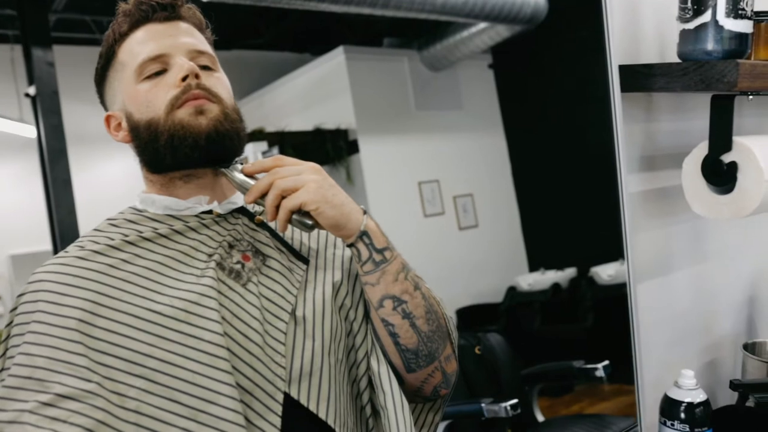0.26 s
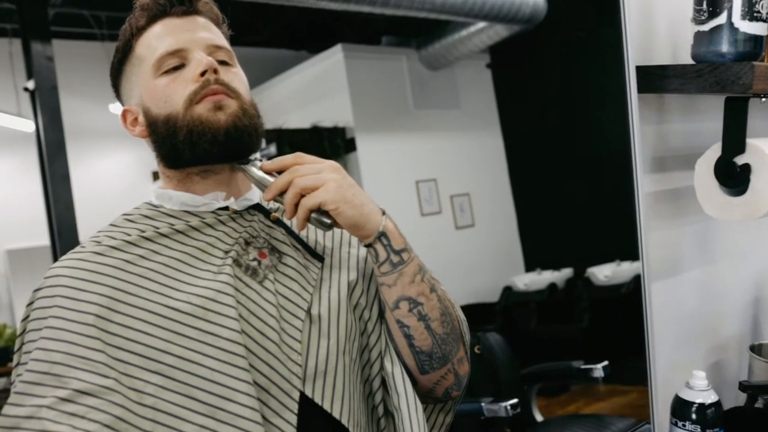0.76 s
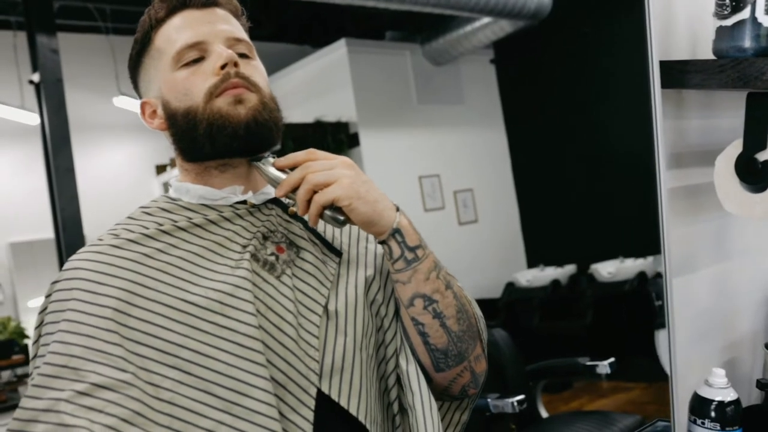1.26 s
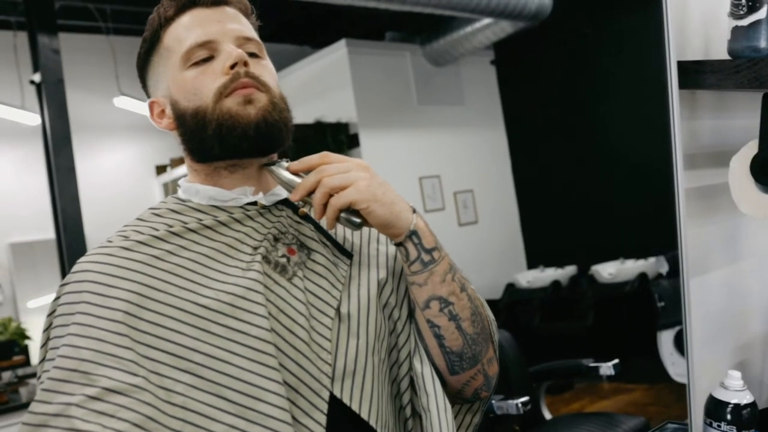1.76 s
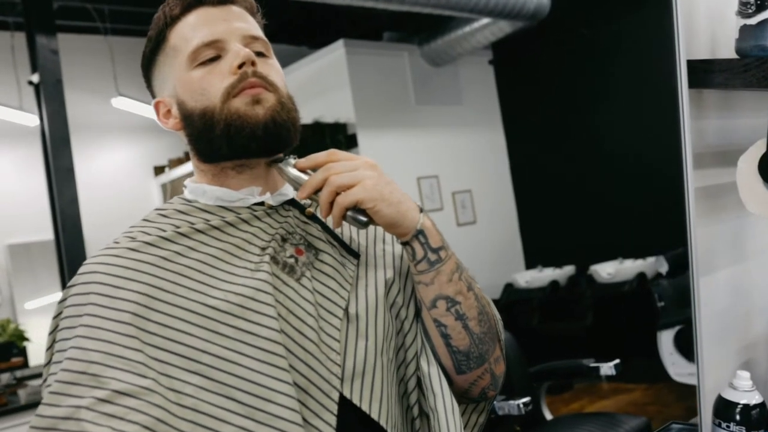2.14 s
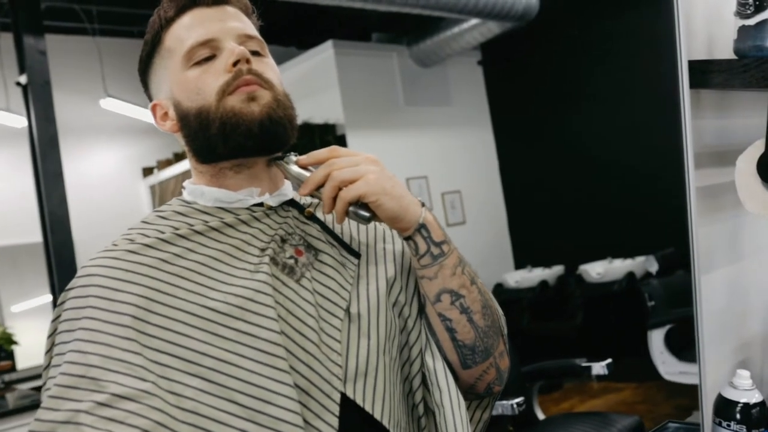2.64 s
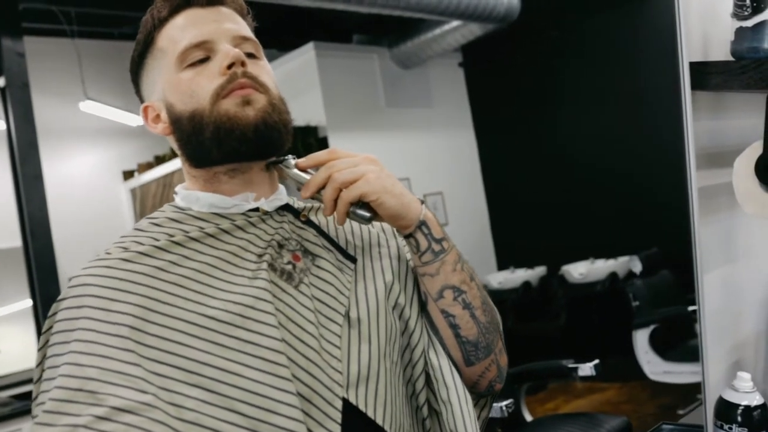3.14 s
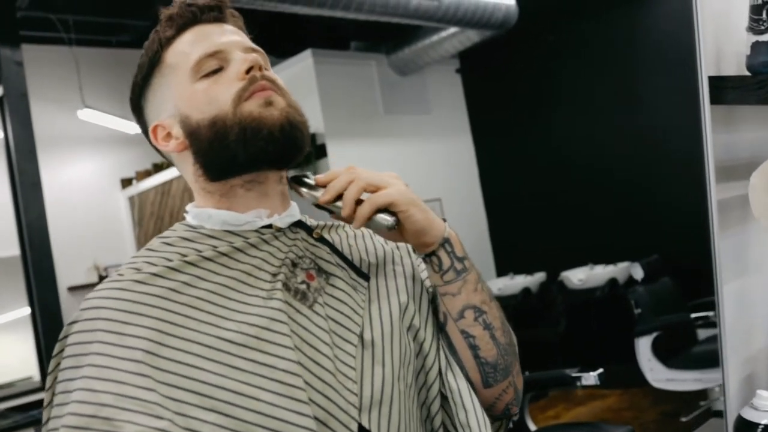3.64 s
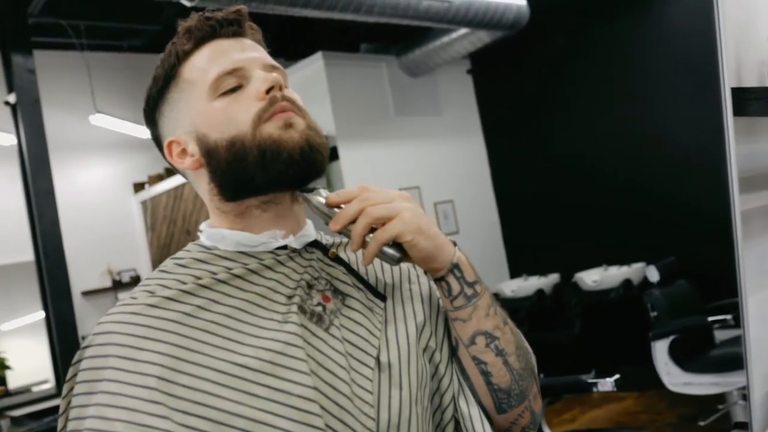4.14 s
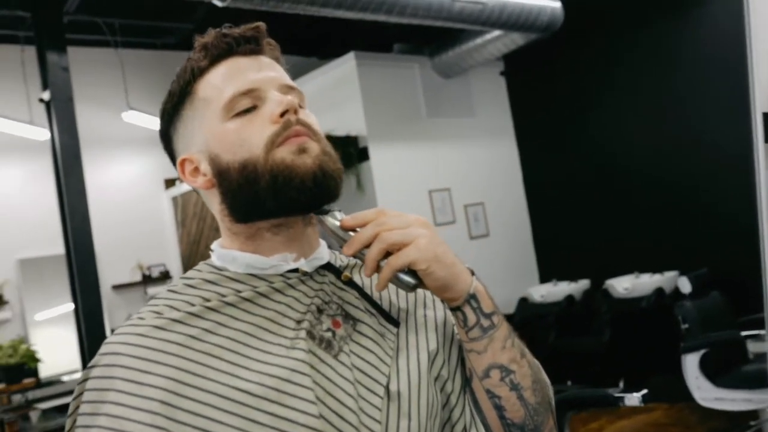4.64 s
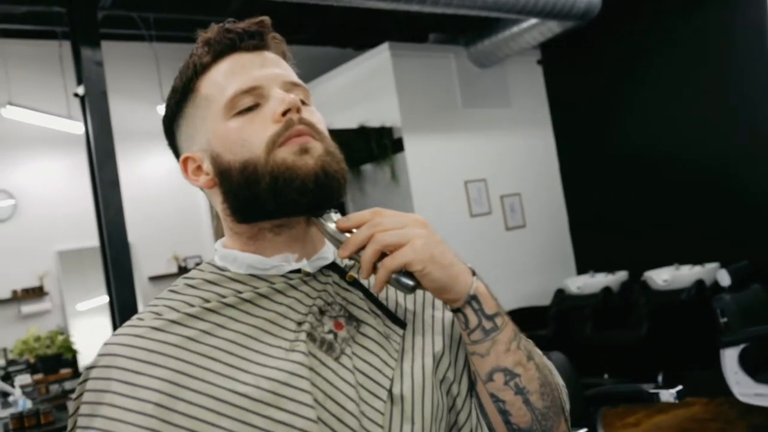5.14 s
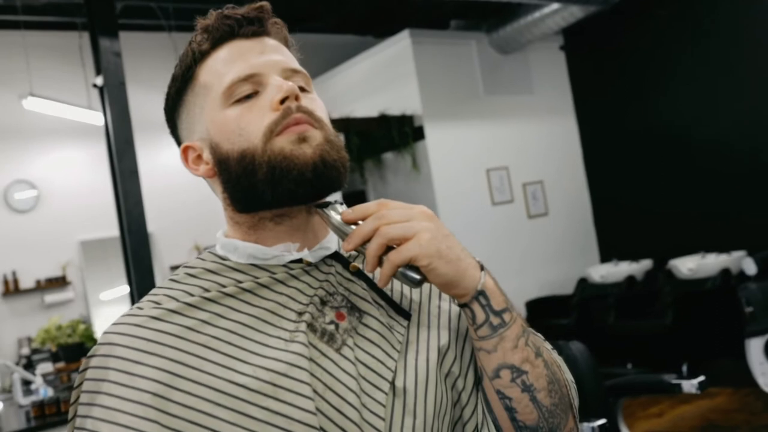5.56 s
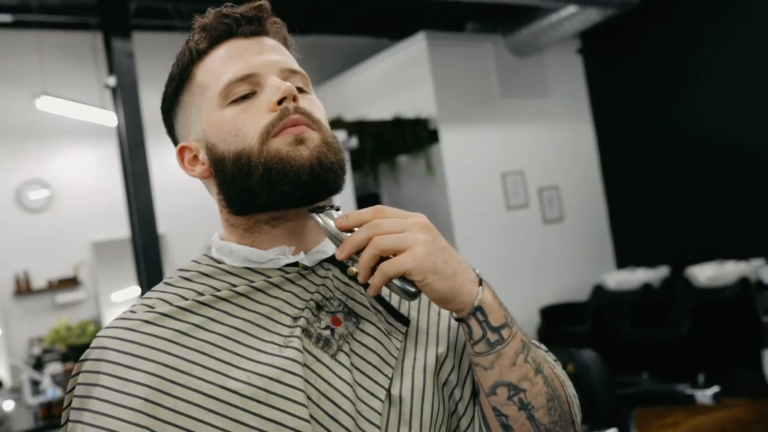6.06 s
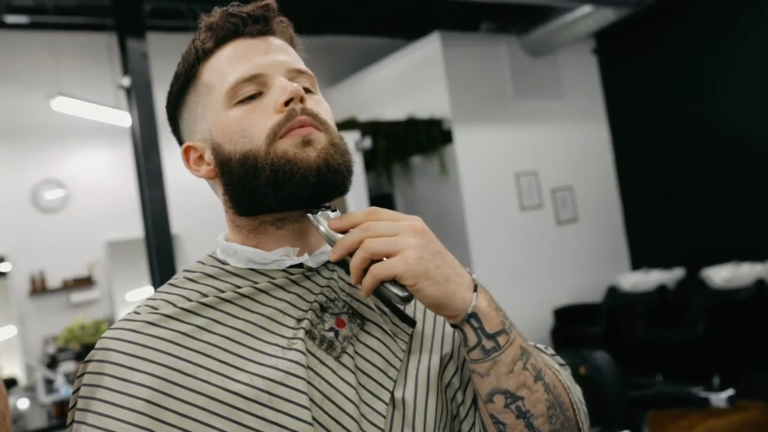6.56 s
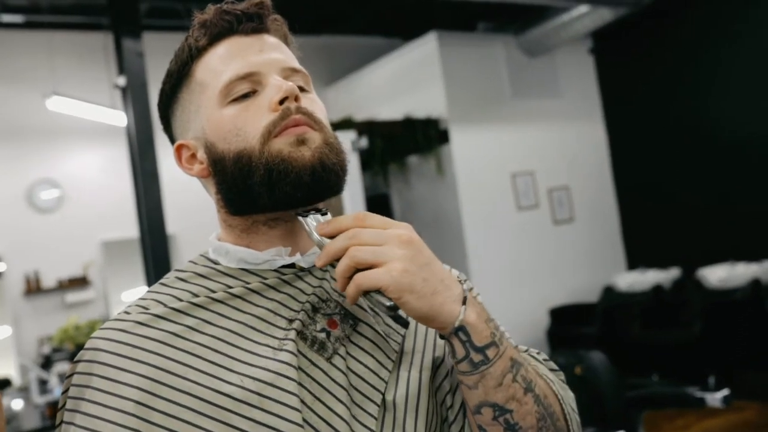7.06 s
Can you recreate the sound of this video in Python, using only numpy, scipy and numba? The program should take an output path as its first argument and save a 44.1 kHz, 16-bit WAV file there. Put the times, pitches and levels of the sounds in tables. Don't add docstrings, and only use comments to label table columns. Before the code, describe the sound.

A small electric trimmer buzzes steadily and brightly up close, with fine crackles of snapping hair as it moves along a beard in a quiet shop.

```python
import sys
import numpy as np
from scipy import signal
from scipy.fft import rfft, irfft
from scipy.io import wavfile
from scipy.ndimage import uniform_filter1d
from numba import njit

SR = 44100
rng = np.random.default_rng(int(sys.argv[2]) if len(sys.argv) > 2 else 0)


def store_pcm(level_fs):
    pcm = np.round(np.clip(level_fs, -1, 1) * 32767).astype(np.int16)
    wavfile.write(sys.argv[1], SR, np.atleast_2d(pcm).T)


def boost(x):
    u = np.asarray(x, float) / 20
    return 10 ** u


N = 321489
TIME_S = np.arange(N) / SR

# start_s, roll [0-1.2]
ROLL = [(0, 0.13), (.5, 0.45), (1.0, 0.46), (1.6, 0.7), (2.7, 0.7), (3.1, 0.03), (3.45, 0.2), (4.75, 0.03),
        (5.1, 0.59), (5.8, 1.04), (6.3, 1.07), (6.65, 0.92), (6.9, 0.9), (7.29, 0.93)]
SAG_LAG_S = 0.04
ROCK_PLACE, STROKE_PLACE = 0.84, 0.39


def curve(table):
    s, *columns = np.transpose(table)
    return [np.interp(TIME_S, s, c) for c in columns]


def level(x, db):
    return x * boost(db) / np.sqrt(np.mean(x ** 2))


def steady(x, span_s=0.33):
    k = int(span_s * SR)
    power = uniform_filter1d(uniform_filter1d(x ** 2, k), k)
    return x / np.sqrt(power + 1e-18)


def walk(rate, at_s):
    k = int(200 / rate)
    steps = np.repeat(rng.standard_normal(2600 // k), k)
    slewed = 1.3 * uniform_filter1d(uniform_filter1d(steps, k), k)
    return np.interp(at_s, np.arange(len(steps)) / 200, slewed)


def colour(x, points, rings=(), size=4096):
    hz = np.arange(size // 2 + 1) * SR / size + 1
    point_hz, point_db = np.array(points)[:, :2].T
    db = np.interp(np.log(hz), np.log(point_hz), point_db)
    db = db + sum(top / (1 + (2 * (hz - f) / width) ** 2) for f, width, top in rings)
    cep = irfft(np.log(boost(db)))
    cep[1:size // 2] *= 2
    cep[size // 2 + 1:] = 0
    return signal.fftconvolve(x, irfft(np.exp(rfft(cep))))[:N]


def clicks(where, size):
    where = np.clip(where, 8, N - 9)
    at = where.astype(int)[:, None] + np.arange(-7, 9)
    gap = at - where[:, None]
    pulse = size[:, None] * np.sinc(gap) * np.cos(np.pi * gap / 16) ** 2
    return np.bincount(at.ravel(), pulse.ravel(), N)


def band(x, lo_hz, hi_hz):
    return signal.sosfiltfilt(signal.butter(2, [lo_hz, hi_hz], "band", fs=SR, output="sos"), x)


@njit
def ring(x, hz, width):
    y, b, l = np.empty(len(x)), 0., 0.
    for i in range(len(x)):
        g, k = np.tan(np.pi * hz[i] / SR), width / hz[i]
        v = (b + g * (x[i] - l)) / (1 + g * (g + k))
        b, l, y[i] = 2 * v - b, l + 2 * g * v, k * v
    return y


def double_ring(knock, hz, wide_hz, narrow_hz):
    return steady(ring(ring(knock, hz, wide_hz), hz, narrow_hz))


def rung(rattle, knock, lo_hz, hi_hz, ring_hz, ring_db, width_hz):
    struck = band(knock, lo_hz, min(hi_hz, 7900))
    return steady(band(rattle, lo_hz, hi_hz)) + boost(ring_db) * steady(ring(struck, ring_hz, width_hz))


def travel(x, bend_s, tail_db, tail_s, size=4096):
    hz = np.arange(size // 2 + 1) * SR / size
    tail = boost(tail_db - 60 * np.arange(size) / SR / tail_s) * rng.standard_normal(size)
    tail[0] = 1
    phase = np.angle(rfft(tail)) - 4 * np.pi * bend_s * np.sqrt(hz * 5000)
    paths = np.roll(irfft(np.exp(1j * phase)), size // 2)
    return signal.fftconvolve(x, paths)[size // 2:size // 2 + N]


def tufts():
    # start_s, length_s, snap_level_db
    bites = [(0.12, 0.011, -68.5), (0.168, 0.074, -54.5), (0.271, 0.033, -53.5), (0.33, 0.044, -53.5),
             (0.42, 0.082, -60.5), (0.57, 0.049, -53.0), (0.697, 0.006, -65.5), (0.841, 0.009, -61.5),
             (0.969, 0.038, -55.0), (1.023, 0.058, -54.5), (1.385, 0.01, -56.0), (1.56, 0.019, -57.5),
             (1.616, 0.0074, -55), (1.72, 0.053, -57.0), (1.803, 0.045, -50.0), (1.989, 0.04, -50.5),
             (2.038, 0.031, -49.5), (2.085, 0.0034, -54.5), (2.229, 0.027, -53), (2.277, 0.017, -52.5),
             (2.375, 0.012, -65), (2.603, 0.026, -57.0), (2.666, 0.0047, -63), (2.758, 0.006, -70),
             (2.858, 0.041, -55), (2.916, 0.039, -54.5), (2.967, 0.0077, -59.5), (3.1, 0.03, -52),
             (3.134, 0.042, -53.5), (3.322, 0.015, -52.0), (3.343, 0.036, -51.5), (3.392, 0.014, -57),
             (3.414, 0.0022, -55), (3.427, 0.0046, -55), (4.534, 0.005, -61), (4.579, 0.0063, -55.5),
             (4.602, 0.021, -57.5), (4.653, 0.007, -56.5), (4.69, 0.031, -55.5), (4.741, 0.058, -53.5),
             (4.837, 0.072, -54), (4.915, 0.09, -53.5), (5.028, 0.062, -56), (5.19, 0.026, -56.0),
             (5.274, 0.046, -54.5), (5.328, 0.034, -54), (5.574, 0.014, -67), (5.61, 0.015, -62),
             (5.8, 0.006, -65), (5.933, 0.0048, -58), (6.021, 0.024, -57), (6.441, 0.005, -77),
             (6.49, 0.006, -61.5), (6.703, 0.011, -65.5), (6.75, 0.023, -55), (6.79, 0.0019, -75),
             (6.805, 0.015, -52.5), (6.825, 0.046, -51.5), (6.905, 0.026, -52.5), (6.954, 0.021, -57)]
    bite_s, clear_s, stubble_db = 0.00524, 0.01104, -76
    t = np.arange(0, N / SR + 1, 1 / 1000)
    start, length, db = np.transpose(bites)[:, :, None]
    edge = np.maximum(start - t, 0) / bite_s + np.maximum(t - start - length, 0) / clear_s
    power = boost(stubble_db + 50) ** 2 + np.sum((boost(db + 50) * np.exp(-edge)) ** 2, axis=0)
    return np.interp(TIME_S, t, np.sqrt(power))


def shaft(load):
    # start_s, speed_hz
    free = [(0, 108.3), (.14, 108.32), (.3, 108.08), (1.3, 108.1), (1.9, 107.95), (2.2, 107.65),
            (2.75, 107.6), (3.05, 107.3), (3.3, 107.25), (3.55, 107.55), (4.5, 107.6), (5.0, 107.25),
            (5.5, 107.55), (6.0, 107.5), (6.2, 107.7), (6.75, 107.7), (7.0, 107.35), (7.29, 107.5)]
    hunt_hz = 0.045 * walk(9, TIME_S)
    sag_hz = 0.8 * uniform_filter1d(load, int(SAG_LAG_S * SR), origin=600)
    return np.cumsum(curve(free)[0] + hunt_hz - sag_hz) / SR


def motor(turns, load):
    # multiple, level_in_group_db
    orders = [(1, -29.5), (2, -25.5), (3, -35), (4, -32), (5, -14), (6, -10.5), (7, 0), (8, -16.5),
              (9, -13), (10, -21), (11, -15), (12, -14), (13, -8), (14, -18.5), (15, -9.5), (16, -17.5),
              (17, -10), (18, -12), (19, -17), (20, -10), (21, -11), (22, -8), (23, -34), (24, -32)]
    # multiple, level_db, db_per_roll, db_per_full_tuft
    turned_orders = [(7, -63.5, 5.5, 0.5), (5, -71, -9.5, 2), (6, -78.5, 3.5, 6.5)]
    roll, = curve(ROLL)
    turned = {k: db + roll_db * roll + tuft_db * load for k, db, roll_db, tuft_db in turned_orders}
    beat = 2 * np.pi * (turns - ROCK_PLACE)
    throb_db = 3 * np.cos(beat) - 2 * np.cos(2 * beat)
    lower_db, upper_db = -60.5, -59.5 - 1.5 * load + throb_db
    out = 0
    for k, db in orders:
        drift_db, start = 1.9 * walk(1.5, TIME_S), rng.random()
        group_db = upper_db if k > 13 else lower_db
        line_db = turned.get(k, group_db + db + drift_db)
        out = out + boost(line_db) * np.sqrt(2) * np.sin(2 * np.pi * (k * turns + start))
    return out


def stroke_taps(turns, load):
    # place_turns, level_db
    tap_places = [(0.022, -5.5), (0.106, 1), (0.199, 0), (0.291, -11.5), (0.406, -26), (0.528, -10),
                  (0.601, -5.5), (.70, -4), (0.812, -33), (0.919, -4)]
    # hz, gain_db
    body_colour = [(900, -20), (1500, -50), (2400, 2.5), (3200, -11), (4100, -3.5), (5000, -1.5), (7200, 4),
                   (7700, -9.5), (8600, -11.5), (9200, -20.5), (10000, -20.5), (11500, -33.5), (14000, -49),
                   (16000, -77)]
    # hz, width_hz, gain_db
    body_rings = [(1645, 170, 2), (2080, 190, 12), (6100, 68, 9.5), (6720, 1160, 3), (8306, 520, 11),
                  (9104, 490, 11.5)]
    turn = np.arange(int(turns[-1]))
    start = np.searchsorted(turns, turn)
    tuft = load[start]
    seat = np.cumsum(0.9 + 2.5 * load)[start] / SR
    taps, stops = [], []
    for place, db in tap_places:
        creep, swell_db = 0.0055 * walk(1.15, seat), 3.4 * walk(1.5, seat)
        late, hard = rng.standard_normal((len(turn), 2)).T
        shake_s = (2.2e-6 + 18e-6 * np.minimum(tuft, 0.7)) * late
        jolt_db = (0.2 + 2.6 * np.minimum(tuft, 0.8)) * hard
        where = np.interp(turn + place + creep, turns, np.arange(N)) + SR * shake_s
        taps.append(clicks(where, boost(db + swell_db + jolt_db)))
        stops.append(clicks(where, boost(jolt_db)))
    body = travel(colour(sum(taps), body_colour, body_rings), bend_s=0.002, tail_db=-17.5, tail_s=0.01)
    knock = travel(stops[1] + stops[6], bend_s=0.002, tail_db=-13.5, tail_s=0.014)
    return body, knock


def case_rattle(body, knock, turns):
    # start_s, upper_hz, upper_db, lower_hz, lower_db, grip_db, rocking_db
    case_rings = [(0, 3400, 0, 3180, -11, 1, 4), (.56, 3460, 3, 3150, -10, 1, 3),
                  (.62, 3740, 2.5, 2910, -3, 3.5, 3.5), (1.2, 3770, -1.5, 2930, 2, 1.5, 6),
                  (1.7, 3830, -6, 3010, 1, -1, 6), (1.85, 3660, -9, 3106, -6.5, 0, 3),
                  (2.4, 3600, -17, 3220, -3, -2.5, 0), (2.8, 3600, -10, 3150, 3, -5, -0.5),
                  (3.1, 3623, -10, 3360, 1, 1.5, 2), (3.5, 3500, 4, 3160, -3, -4, 1),
                  (3.8, 3440, 0, 3000, -6, -3.5, 4.5), (3.9, 3530, -1, 2870, -1, -1.5, 3.5),
                  (4.6, 3620, 0, 2783, 0, 1, 3), (4.9, 3560, 0, 2860, -4, -1.5, 0),
                  (5.1, 3660, 1, 3310, -0.5, 2, 0), (5.5, 3720, -4, 3323, 6, -1.5, 3),
                  (6.5, 3530, -1, 3150, 3.5, -0.5, 7), (7.29, 3600, -4, 3150, -1, 3, 5)]
    case_hz, case_db, deep_hz, deep_db, grip_db, rock_db = curve(case_rings)
    case = rung(body, knock, 2663, 4050, case_hz, case_db, 260.0)
    case = case + boost(deep_db) * double_ring(knock, deep_hz, 670.0, 290.0)
    case = np.roll(band(case, 2570, 4840), int(0.0039 * SR))
    beat = 2 * np.pi * (turns - ROCK_PLACE)
    return case * boost(rock_db * np.cos(beat) + 2.3 * np.cos(2 * beat)), grip_db


def blade_ring(body, knock, stroke):
    # start_s, lower_hz, lower_db, outward_lead_db, upper_hz, upper_db
    steel_rings = [(0, 4780, 12, -1, 5170, 4), (.45, 4800, 3, 6.5, 5250, -2), (.62, 4600, 5, 4, 4980, 7),
                   (1.3, 4680, 6, 2.5, 4970, 8), (1.62, 4830, 11, 2.5, 5210, 3.5),
                   (1.9, 4930, 5, -1, 5130, 8), (2.33, 4900, -8, 1.5, 5090, 11),
                   (2.75, 4800, -10, 3, 5150, 6), (3.0, 4700, -2, -1, 5200, -6),
                   (3.15, 4530, 3.5, 2, 5210, -11), (3.42, 4560, 10, 1, 5230, 0),
                   (3.5, 4900, 7, 1, 5255, 10.5), (3.6, 4650, 9, 4.5, 5300, -6),
                   (3.81, 4720, 7.5, 2.5, 5400, -2), (3.87, 4720, 1.5, 4.5, 5150, 0),
                   (4.4, 4750, 6, 6, 5120, 2), (4.63, 4700, 6, 3, 5190, -5), (4.85, 4640, 7, 4, 5300, 1),
                   (5.46, 4580, 3, 0, 5020, -4), (5.7, 4570, -3, -1, 5020, -8),
                   (6.01, 4800, 2, 6, 5140, -5), (6.12, 4730, 3, 6, 5040, -12),
                   (6.21, 4600, 4, 2, 5260, -4), (6.56, 4770, 7, 5, 5100, -10),
                   (6.88, 4770, 1, 3, 5110, -6), (7.0, 4720, 5, 0, 5300, -5), (7.29, 4560, 9, 3, 4980, -7)]
    low_hz, low_db, lead_db, high_hz, high_db = curve(steel_rings)
    steel = rung(body, knock, 3870, 5570, low_hz, low_db + lead_db * np.cos(stroke), 380.0)
    return steel + boost(high_db + 5 * np.cos(stroke)) * double_ring(knock, high_hz, 640.0, 500.0)


def comb_and_teeth(body, knock, stroke):
    # start_s, comb_hz, comb_db, teeth_hz, teeth_db
    head_rings = [(0, 6030, 6, 6800, 2), (.55, 5870, 8, 7050, 0.5), (.7, 6000, -16, 6800, 1),
                  (1.6, 6000, -14, 6800, 3.5), (2.2, 6000, 12, 7070, 2.5), (2.9, 6050, 8, 7155, -1.5),
                  (3.3, 6520, -2, 6710, -3), (3.6, 6340, 5, 6720, -8), (3.9, 5860, 4, 7400, -8),
                  (4.5, 6005, -1, 7360, -4.5), (4.8, 6040, -13, 6840, 0), (5.25, 6260, 2, 7050, 2),
                  (5.8, 6200, 11, 6670, 5), (6.2, 6100, -3, 6830, 3.5), (6.7, 5793, 1, 7000, 0),
                  (7.29, 5880, 0, 7100, -1)]
    comb_early_s, teeth_early_s = 0.0005, 0.0007
    comb_hz, comb_db, teeth_hz, teeth_db = curve(head_rings)
    comb = rung(body, knock, 5480, 6940, comb_hz, comb_db, 320.0)
    teeth = rung(body, knock, 6760, 15500, teeth_hz, teeth_db, 550.0)
    comb = np.roll(comb, -int(comb_early_s * SR))
    teeth = np.roll(teeth, -int(teeth_early_s * SR)) * boost(0.5 * np.cos(stroke))
    return comb, teeth


def rattle(turns, load):
    # start_s, nearness_db, tilt_db (+ comb, - flat of the blade)
    hand = [(0, 0, -4), (.6, 0, 3), (.8, 0.5, 0.5), (1.6, -0.5, -5), (2.2, 0.5, 6.5), (2.6, 1, 8.5),
            (2.95, -4, 1.5), (3.3, -5, -7), (3.55, -0.5, 5), (3.75, 1.5, -1), (4.2, 0, 1), (4.6, -0.5, 0),
            (4.85, -0.5, 0.5), (5.45, -0.5, 2), (6.08, 1, 12.5), (6.3, 0, 10), (6.9, 1, 10.5),
            (7.29, -3.5, 5.5)]
    # level_db, db_per_nearness_db, db_per_tilt_db, db_per_roll, db_per_full_tuft
    part_levels = [
        (-48.5, 0.65, 0.11, -0.9, -3),
        (-45, 1.25, -0.22, 2.2, 1.6),
        (-52, -0.7, 0.86, -3.3, 0),
        (-48.5, 0, -0.062, 2, -3),
        (-85, 0.5, 0.16, 5.5, 1),
    ]
    stroke_gaps = 2.6, 2.6, 1.0, 4
    body, knock = stroke_taps(turns, load)
    stroke = 2 * np.pi * (turns - STROKE_PLACE)
    case, grip_db = case_rattle(body, knock, turns)
    edge = band(knock, 8500, 15000)
    metal = [blade_ring(body, knock, stroke), *comb_and_teeth(body, knock, stroke), edge]
    parts = [case] + [part * boost(db * np.cos(2 * stroke)) for part, db in zip(metal, stroke_gaps)]
    near_db, tilt_db = curve(hand)
    nearness = [near_db + grip_db] + [near_db] * len(metal)
    roll, = curve(ROLL)
    press = uniform_filter1d(load, int(SAG_LAG_S * SR))
    out = 0
    for (db, by_near, by_tilt, by_roll, by_tuft), part, near in zip(part_levels, parts, nearness):
        part_db = db + by_near * near + by_tilt * tilt_db + by_roll * roll + by_tuft * press
        out = out + boost(part_db) * steady(part)
    return out


def hair(turns, load, most_per_s=1800):
    # hz, gain_db
    snap_colour = [(350, -44.5), (520, -17.5), (900, -15.5), (1350, -13), (1600, -4), (2100, -5),
                   (2600, -6.5), (3500, -7.5), (6500, -9.5), (8000, -10.5), (10000, -16), (14000, -57)]
    # hz, width_hz, gain_db
    snap_rings = [(750, 90, 12.5), (1040, 160, 4.5), (1556, 120, 4), (2003, 103, 8), (2200, 72, 2),
                  (3150, 620, 8.5), (4900, 1100, 10.5), (6000, 180, 8)]
    when, luck, hard, sign = rng.random((40000, 4)).T
    where = when * N
    closing_db = 4 * np.cos(4 * np.pi * (turns - STROKE_PLACE + 0.15))
    here = (load * boost(closing_db))[where.astype(int)]
    kept = luck * len(when) * SR / N < most_per_s * here
    size = kept * np.sqrt(here) * boost(np.minimum(-2.8 * np.log(hard), 9)) * np.sign(sign - 0.5)
    snaps = colour(clicks(where, size), snap_colour, snap_rings)
    return level(travel(snaps, bend_s=0.001, tail_db=-13.5, tail_s=0.012), -54.0)


def hiss():
    # hz, density_db_per_hz
    mid_colour = [(10, -2), (20, -7), (40, -15), (76, -22), (200, -25.5), (450, -31), (1200, -32),
                  (5000, -19), (10000, -34), (14000, -48.5)]
    # hz, density_db_per_hz
    side_colour = [(20, -4), (100, 2), (450, -5), (1000, -14), (3000, -11), (6000, -0.5), (10000, 0),
                   (12000, -10), (14500, -19)]
    mid = level(colour(rng.standard_normal(N), mid_colour, size=16384), -61.5)
    side = level(colour(rng.standard_normal(N), side_colour), -74.5)
    return np.array([mid + side, mid - side])


def scene():
    smooth = tufts()
    turns = shaft(smooth)
    load = smooth * boost(0.6 * walk(60, TIME_S))
    return motor(turns, smooth) + rattle(turns, load) + hair(turns, load) + hiss()


def band_limit(x):
    return signal.sosfilt(signal.butter(12, 14350, fs=SR, output="sos"), x)


def record(dry):
    return band_limit(dry)


dry = scene()
out = record(dry)
store_pcm(out)
```